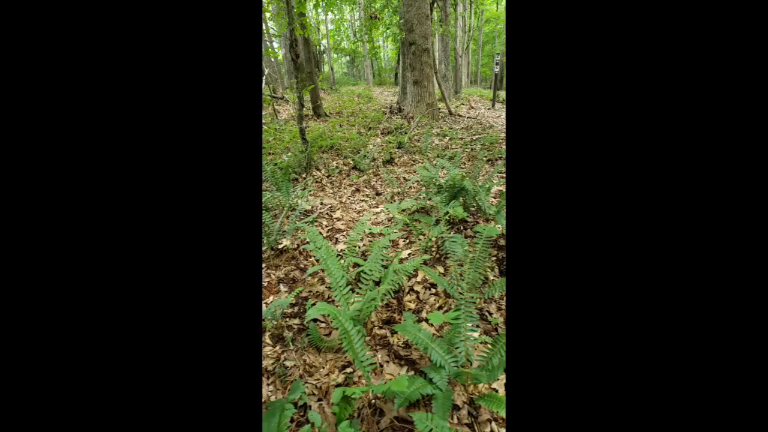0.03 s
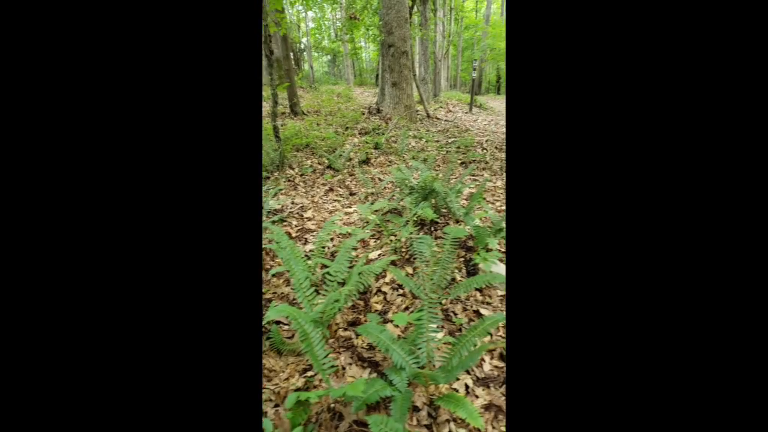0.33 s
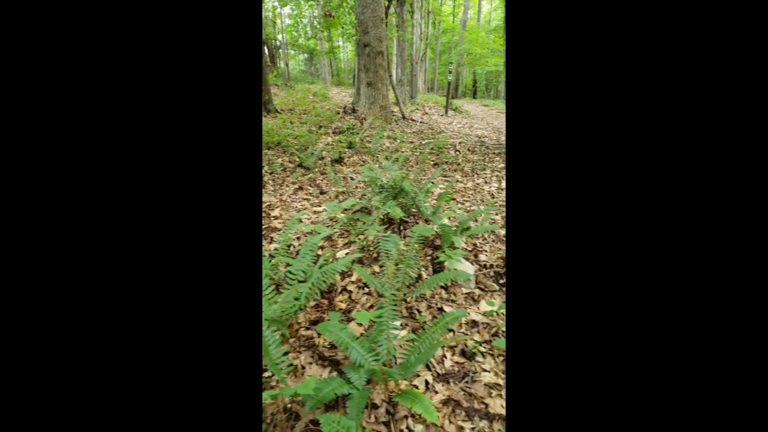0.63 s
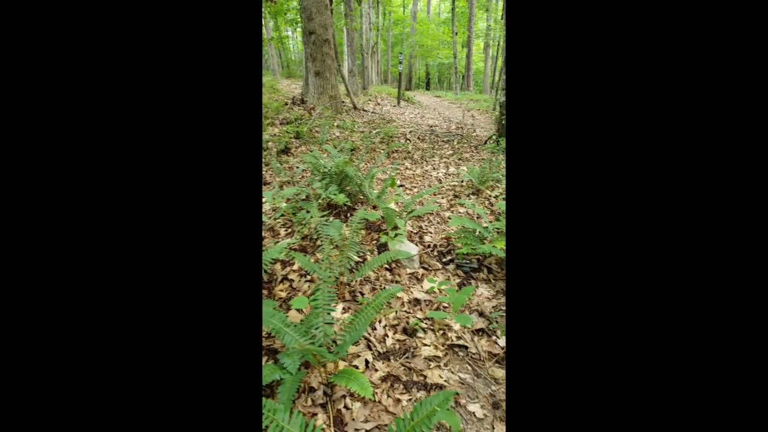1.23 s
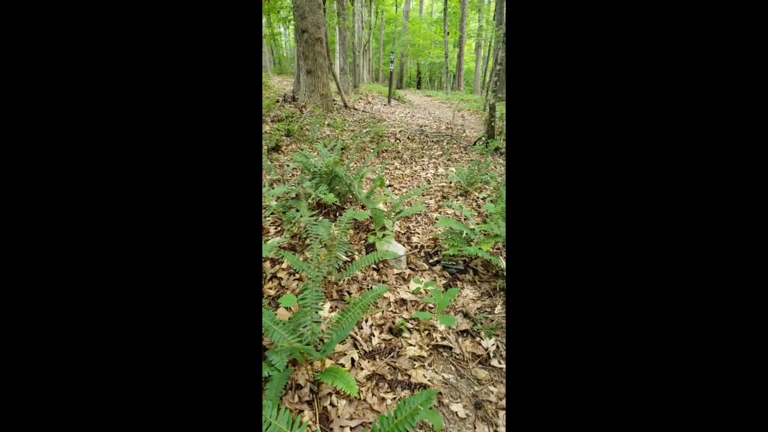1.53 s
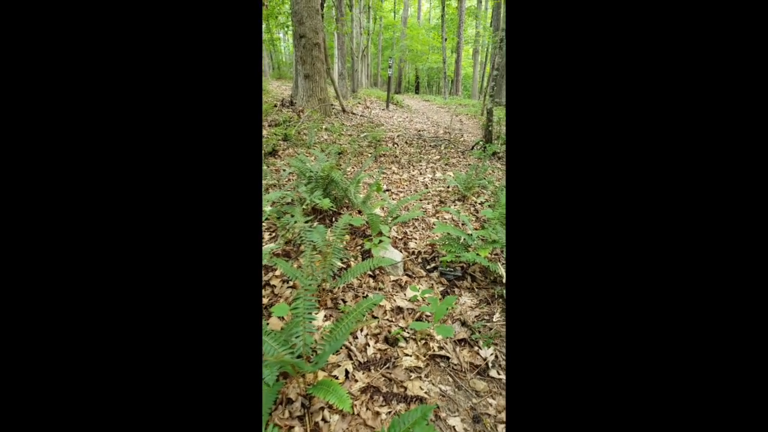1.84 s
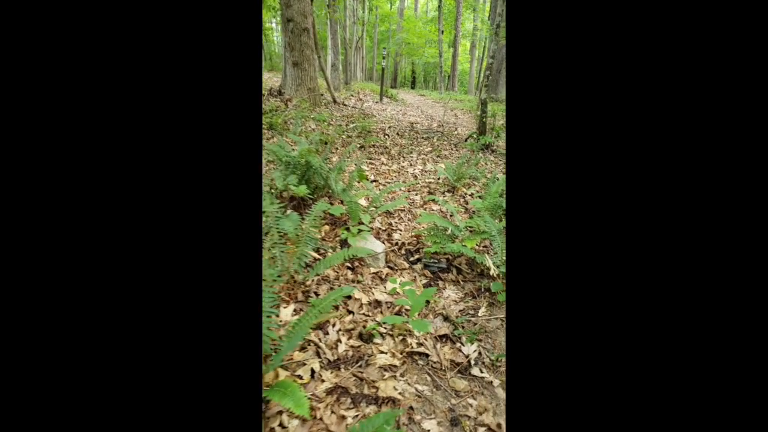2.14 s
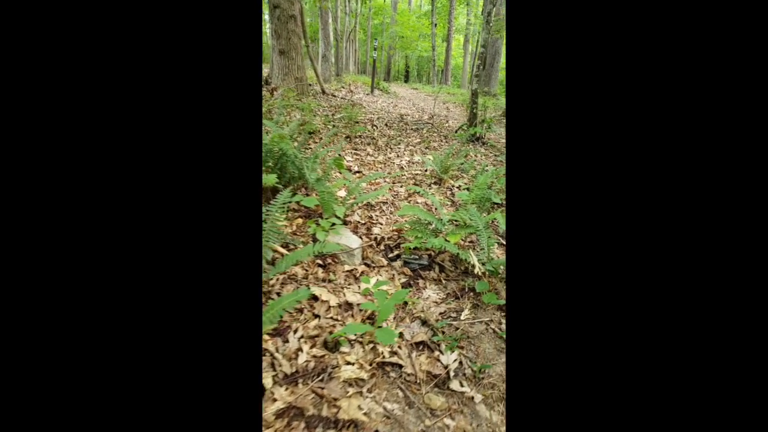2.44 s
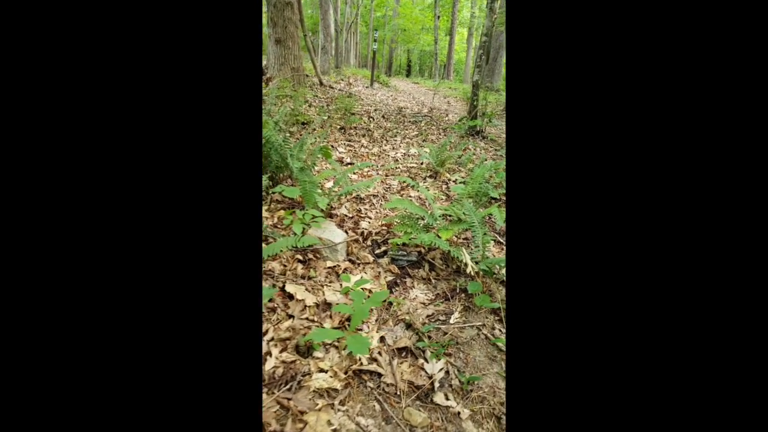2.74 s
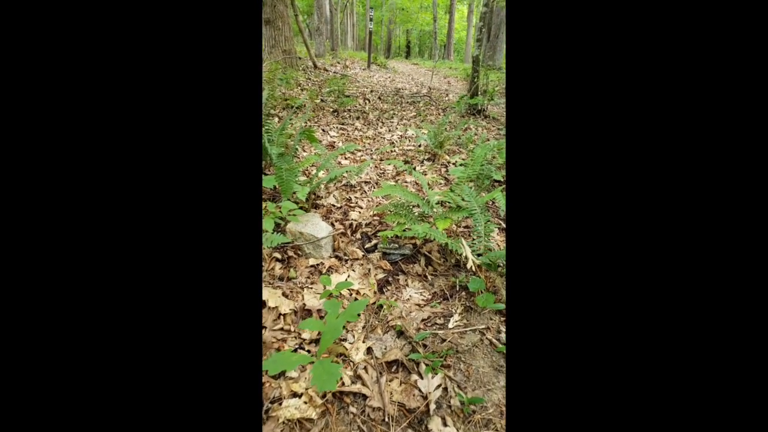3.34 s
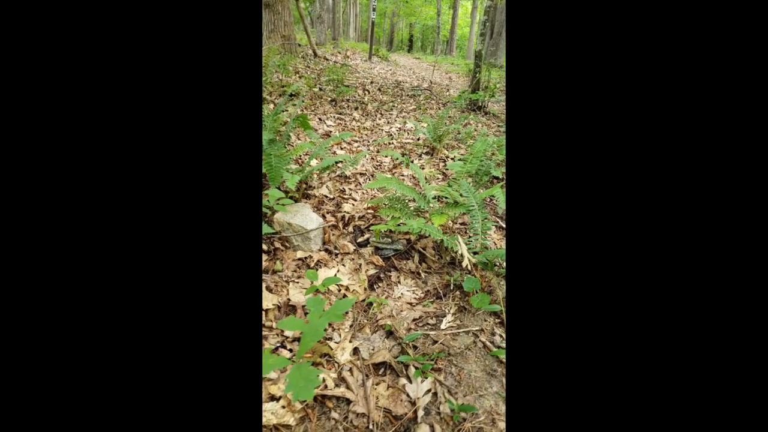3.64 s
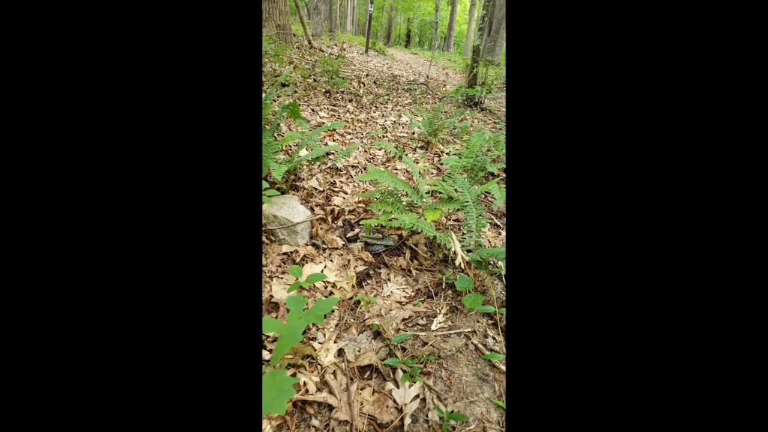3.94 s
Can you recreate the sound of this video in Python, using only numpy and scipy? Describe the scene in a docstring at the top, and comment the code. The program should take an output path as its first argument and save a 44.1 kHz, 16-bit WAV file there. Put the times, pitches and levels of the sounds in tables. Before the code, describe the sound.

Insects buzz steadily over woodland wind, with faint leaf rustles and a twig cracking.

```python
"""A woodland floor fades in, heard from a hand-held phone: wind rumbles and sighs in the trees under
a steady, distant insect chorus, whose buzz is sharpened and pulled left by a port resonance near 5 kHz.
A far bird whistles at first, its tones reverberating among the trunks. Then air buffets come and go,
and dry leaves tick and rustle. Near the end come one soft scuff and bump, and a twig cracks."""
import sys
import numpy as np
from scipy import signal
from scipy.fft import rfft, irfft
from scipy.io import wavfile
from scipy.ndimage import uniform_filter1d

SR = 44100
rng = np.random.default_rng(int(sys.argv[2]) if len(sys.argv) > 2 else 0)


def generate_wav(sig):
    """Save sig (samples, or channels by samples) to the path in sys.argv[1] as 16-bit PCM at SR."""
    pcm = np.round(np.clip(np.atleast_2d(sig).T, -1, 1) * 32767).astype(np.int16)
    wavfile.write(sys.argv[1], SR, pcm)


N = 176400
T = np.arange(N) / SR
SIDE = np.array([[1], [-1]])  # opposite polarity in left and right

def undb(db):
    """Amplitude ratio of a level in decibels."""
    return 10 ** (np.asarray(db) / 20)

def unit(x):
    """Normalisation to rms 1."""
    return x / np.sqrt(np.mean(x ** 2))

def envelope(points):
    """Amplitude envelope through (time [s], level [dB]) points."""
    return undb(np.interp(T, *np.array(points).T))

def colour(x, points):
    """Zero-phase filtering through (frequency [Hz], gain [dB]) points."""
    hz, db = np.array(points).T
    bins = np.maximum(np.arange(N // 2 + 1) * SR / N, 1)
    return irfft(rfft(x) * undb(np.interp(np.log(bins), np.log(hz), db)), N)

def drift(rate_hz):
    """Smooth random modulation of rms 1."""
    hold = int(SR / rate_hz)
    steps = np.repeat(rng.standard_normal(N // hold + 1), hold)
    return unit(uniform_filter1d(uniform_filter1d(steps, hold), hold)[:N])

def phase(hz):
    """Phase as the time integral of frequency."""
    return 2 * np.pi * np.cumsum(hz) / SR

def air(spectrum, side_spectrum):
    """Mid-side noise whose width depends on frequency."""
    mid, side = colour(rng.standard_normal((2, N)), spectrum)
    return unit(mid + SIDE * colour(side, side_spectrum))

def rightward(x, db):
    """A level difference between the channels shifts a sound to the right."""
    return x * undb(-SIDE * db / 2)

# spectrum of the wind's rumble (frequency [Hz], relative density [dB])
RUMBLE_SPECTRUM = [(15, -31), (25, -18), (42, -13), (58, 2), (82, -4), (125, -4), (180, -15), (260, -24.5),
                   (500, -45.5)]
# its stereo width (frequency [Hz], side against mid [dB])
RUMBLE_WIDTH = [(30, -5), (60, -9), (130, -18.5), (300, -5)]
def rumble():
    """Turbulence in the wind: low noise with a fluttering level."""
    return air(RUMBLE_SPECTRUM, RUMBLE_WIDTH) * undb(-47.5 + drift(12))

# spectrum of wind in the trees (frequency [Hz], relative density [dB])
TREE_SPECTRUM = [(100, -2.5), (230, 2), (330, 3), (440, -0.5), (560, -2.5), (850, -5), (1250, -16),
                 (1600, -19), (1950, -30), (2800, -29), (5000, -27.5), (8000, -45), (15000, -39)]
# its stereo width (frequency [Hz], side against mid [dB])
TREE_WIDTH = [(200, -13), (400, -9.5), (700, -5.5), (1200, 0), (3000, 9)]
def treetops():
    """Flow noise in the trees: an even, broadband sigh."""
    return air(TREE_SPECTRUM, TREE_WIDTH) * undb(-59.5 + .4 * drift(4.5))

# buffets of air (time [s], level [dB])
AIR_BUFFETS = [(1.059, -40.5), (1.19, -39), (1.936, -32), (2.33, -40), (2.478, -38.5), (2.67, -39),
               (2.92, -43), (3.24, -42.5), (3.76, -49)]
def buffets(hz=56.86, sigma_s=.023, side_db=-4):
    """Pressure fluctuations: Gaussian pulses of a low, wavering tone."""
    mid, side = (np.sin(phase(hz * (1 + .2 * drift(50)))) for _ in range(2))
    push = sum(undb(db) * np.exp(-.5 * ((T - at) / sigma_s) ** 2) for at, db in AIR_BUFFETS)
    return push * (mid + SIDE * undb(side_db) * side)

# spectrum of the insect chorus (frequency [Hz], relative density [dB])
CHORUS_SPECTRUM = [(1700, -30), (2400, -3), (3500, -1), (4400, 3), (5100, 2.5), (6000, -1.5), (7700, -1.5),
                   (9000, -7.5), (15000, -10)]
def insects(count=6, pulse_hz=61.66, depth=.44, sway_db=3.05):
    """Incoherent summation: far rasps, each amplitude-modulated at its own rate, merge into a buzz."""
    chorus = 0
    for _ in range(count):
        rate_hz = pulse_hz * np.exp(.4 * rng.standard_normal()) * (1 + .0309 * drift(4))
        pulsing = 1 + depth * np.cos(phase(rate_hz))
        sway = undb(-sway_db * drift(5.37))
        chorus += pulsing * sway * rng.standard_normal((2, N))
    return unit(colour(chorus, CHORUS_SPECTRUM)) * undb(-67)

# bird whistles (onset [s], duration [s], first frequency [Hz], last frequency [Hz], level [dB])
BIRD_WHISTLES = [(0.401, .095, 2556, 1930, -62.5), (.46, .17, 2006, 1740, -65.5),
                 (0.424, 0.227, 2648, 2570, -63), (0.607, 0.202, 2563, 2440, -70.5),
                 (0.833, 0.096, 2817, 2813, -71), (1.167, 0.28, 2520, 2150, -75)]
def bird(ease=.72, t60_s=.98, direct_gain=.64):
    """Reverberation: pure gliding whistles are smeared by reflections among the trunks."""
    warble = 1 + .00804 * drift(59.17)
    song = 0
    for onset, duration, first, last, db in BIRD_WHISTLES:
        progress = np.clip((T - onset) / duration, 0, 1)
        glide = (1 - np.exp(-ease * progress)) / (1 - np.exp(-ease))
        hz = first + (last - first) * glide
        arch = np.sqrt(4 * progress * (1 - progress))
        song += undb(db) * arch * np.sin(phase(hz * warble))
    decay = np.exp(-np.log(1000) * T / t60_s)
    reflections = unit(rng.standard_normal((2, N)) * decay) / np.sqrt(N)
    return direct_gain * song + signal.fftconvolve(song[None], reflections, axes=1)[:, :N]

# spectrum of dry leaves (frequency [Hz], relative density [dB])
LEAF_SPECTRUM = [(500, -20), (2000, -2.5), (4500, -3), (7000, -2.5), (10000, 16.5), (13500, 16.5),
                 (16000, 29.5)]
# course of their rustle (time [s], level [dB])
RUSTLE_LEVELS = [(.4, -89), (.75, -66.5), (1.15, -88), (1.6, -93), (1.78, -68), (2.03, -76), (2.2, -92),
                 (2.52, -74.5), (2.78, -63), (3.05, -68), (3.26, -56.5), (3.41, -70), (3.55, -65),
                 (3.66, -64), (3.76, -59), (3.88, -67), (4, -62)]
def leaves(crackles_per_s=1400, spread_db=1):
    """Shot noise: tiny crackles arrive at random over a papery hiss."""
    arrivals = rng.random(N) < crackles_per_s / SR
    strengths = undb(spread_db * np.minimum(rng.exponential(size=N), 4))
    crackle = unit(arrivals * strengths * rng.standard_normal((2, N)))
    hiss = .94 * rng.standard_normal((2, N))
    rustle = unit(colour(crackle + hiss, LEAF_SPECTRUM))
    return rightward(rustle * envelope(RUSTLE_LEVELS), db=29)

# spectrum of the scuff (frequency [Hz], relative density [dB])
SCUFF_SPECTRUM = [(300, 0), (700, 10), (1500, 10), (2600, 6), (5000, 10), (7000, 6), (10000, 12.5),
                  (12500, 15), (15500, 12)]
# its rise and fall (time [s], level [dB])
SCUFF_LEVELS = [(3.45, -75), (3.49, -53.5), (3.511, -47), (3.525, -52), (3.565, -57), (3.62, -66)]
def scuff():
    """Friction noise: one brief slide through the leaf litter."""
    friction = unit(colour(rng.standard_normal((2, N)), SCUFF_SPECTRUM))
    return rightward(friction * envelope(SCUFF_LEVELS), db=6.5)

# knocks against the phone (onset [s], frequency [Hz], envelope peak [dB], time constant [s])
PHONE_KNOCKS = [(3.5002, 460, -41.5, 0.0026), (3.5053, 470, -40, 0.0023), (3.5098, 5080, -58.5, .0015),
                (3.5156, 386, -33.5, 0.001)]
def handling():
    """Heavily damped oscillation: a quick run of dull bumps with a light tap among them."""
    knocks = 0
    for onset, hz, db, tau in PHONE_KNOCKS:
        age = np.maximum(T - onset, 0)
        pulse = age / tau * np.exp(1 - age / tau)
        knocks += undb(db) * pulse * np.sin(2 * np.pi * hz * age)
    return knocks

# spectrum of a snap (frequency [Hz], gain [dB])
SNAP_SPECTRUM = [(500, -16), (2500, -12), (4500, -9), (6200, 3.5), (7300, -1.5), (9000, 4.5), (12000, 6),
                 (13300, 12.5), (16000, 2)]
# leaves and twigs snapping (onset [s], gain [dB], time constant [s], treble gain [dB])
FRACTURES = [(2.57, -52.5, .004, 0.5), (2.762, -51.5, 0.0047, 0), (2.914, -45, 0.0042, -16),
             (3.168, -45, 0.0022, -14), (3.233, -47, .002, -5), (3.263, -46, 0.0024, 0),
             (3.362, -52, 0.0023, -2), (3.6875, -59, .001, -3), (3.722, -38.5, .0021, 4),
             (3.730, -51, .001, -3), (3.7385, -50, .001, -5), (3.782, -55, .001, 5)]
def snaps(treble_edge_hz=8500):
    """Brittle fracture: noise bursts decay within milliseconds, some duller than others."""
    noise = colour(rng.standard_normal((2, N)), SNAP_SPECTRUM)
    body = signal.sosfiltfilt(signal.butter(4, treble_edge_hz, fs=SR, output="sos"), noise)
    treble = noise - body
    cracks = 0
    for onset, db, tau, treble_db in FRACTURES:
        decay = (T >= onset) * np.exp(-np.abs(T - onset) / tau)
        cracks += undb(db) * decay * (body + undb(treble_db) * treble)
    return rightward(cracks, db=5)

def scene():
    """Superposition of all sources at the two microphones."""
    wind = rumble() + treetops() + buffets()
    return wind + insects() + bird() + leaves() + scuff() + handling() + snaps()

# response of the left microphone port, resonant near 5 kHz (frequency [Hz], gain [dB])
LEFT_RESPONSE = [(100, 1), (500, 2.5), (1500, 3.5), (2400, 9), (3600, 9), (4500, 13), (4950, 19.5),
                 (5250, 20.5), (5600, 12.5), (6400, 3), (7800, -7), (8200, -22), (11000, -16),
                 (13500, -9.5), (14900, 0), (16000, -6)]
# response of the right port (frequency [Hz], gain [dB])
RIGHT_RESPONSE = [(100, 2), (500, 0), (2000, 1.5), (4000, -1), (5200, -2.5), (6500, -3), (7700, 3.5),
                  (9300, -11.5), (11000, -9.5), (12500, -6.5), (16000, -13)]
# the phone's fade-in (time [s], gain [dB])
FADE_IN = [(.374, -90), (.382, -24.5), (.42, -14), (.48, -9), (.66, 0.5), (.95, .5), (1.2, -1), (1.8, 0),
           (4, -0.5)]
def record(dry, cutoff_hz=15700):
    """Port resonance colours each side; the level fades in and a low-pass limits the bandwidth."""
    ported = np.array([colour(dry[0], LEFT_RESPONSE), colour(dry[1], RIGHT_RESPONSE)])
    lowpass = signal.ellip(10, .2, 70, cutoff_hz, fs=SR, output="sos")
    return signal.sosfilt(lowpass, ported * envelope(FADE_IN))

dry = scene()
out = record(dry)
generate_wav(out)
```